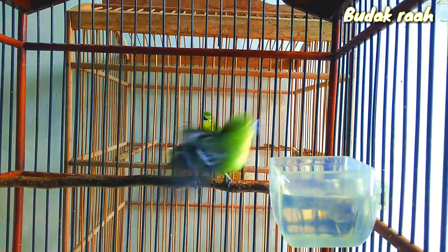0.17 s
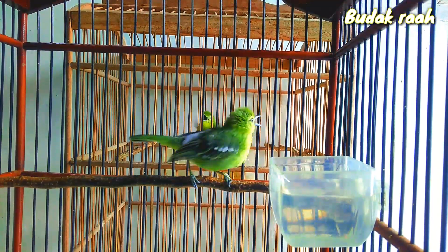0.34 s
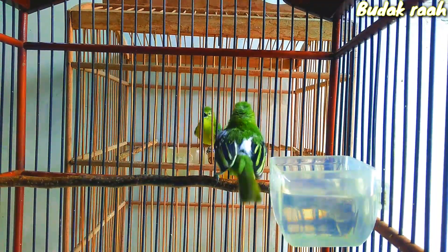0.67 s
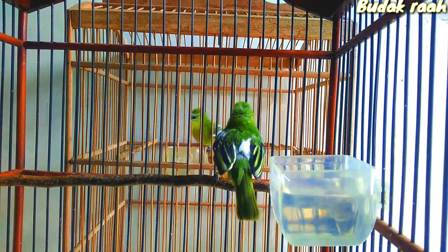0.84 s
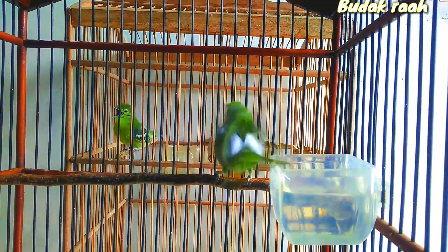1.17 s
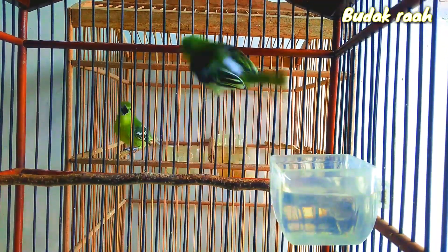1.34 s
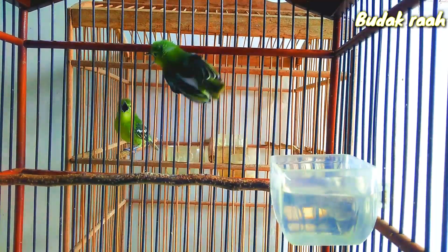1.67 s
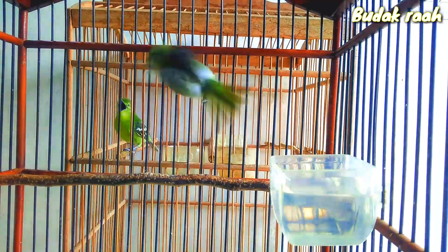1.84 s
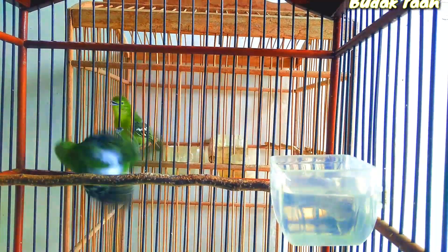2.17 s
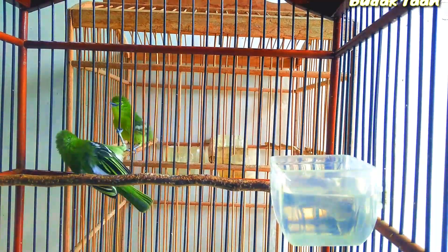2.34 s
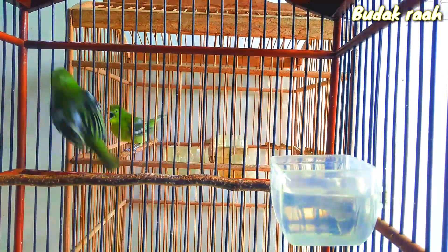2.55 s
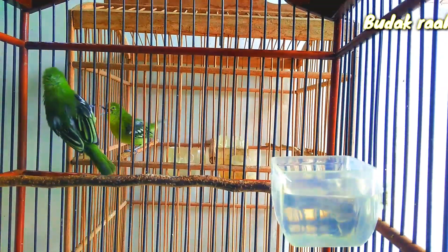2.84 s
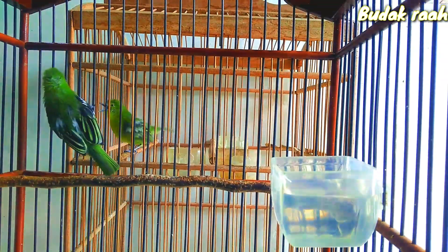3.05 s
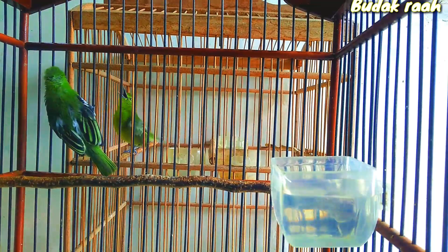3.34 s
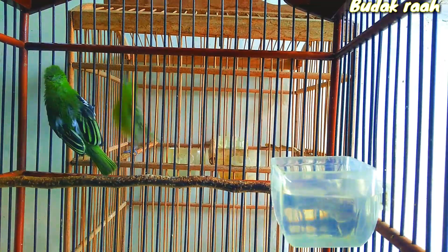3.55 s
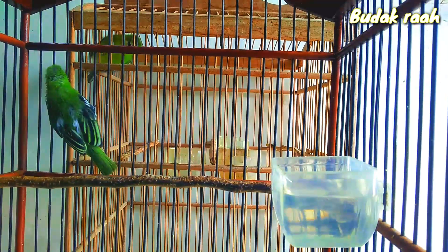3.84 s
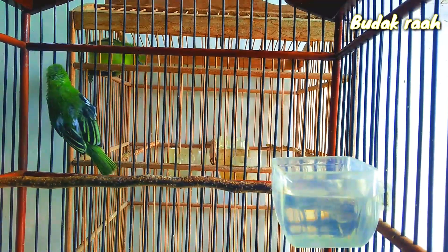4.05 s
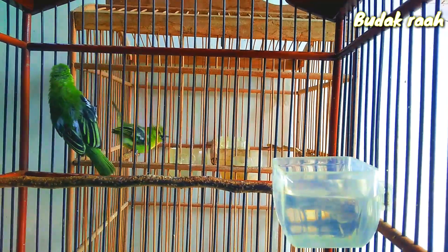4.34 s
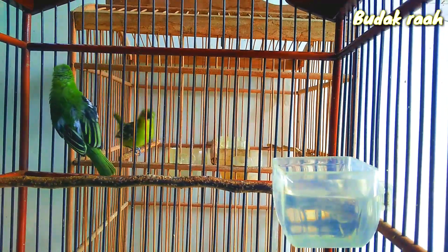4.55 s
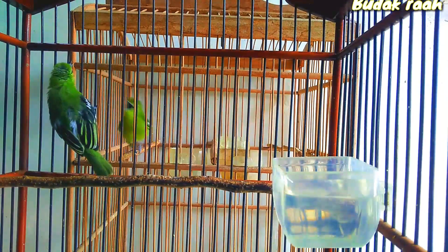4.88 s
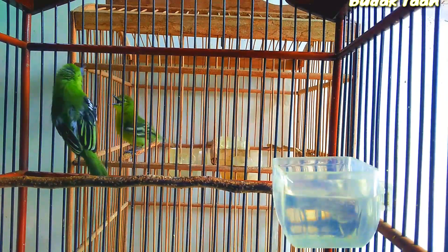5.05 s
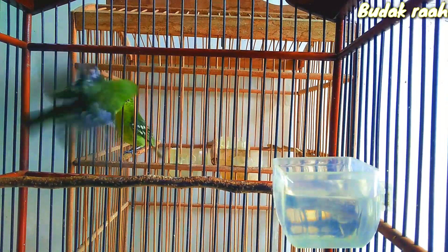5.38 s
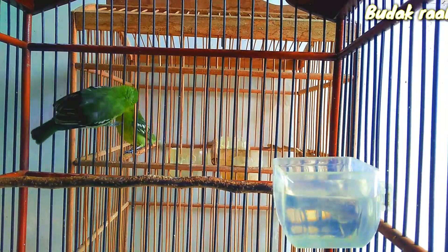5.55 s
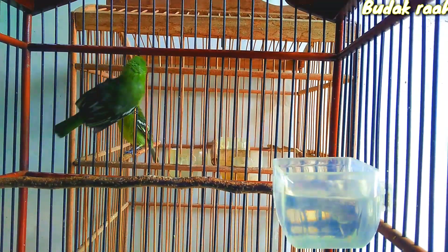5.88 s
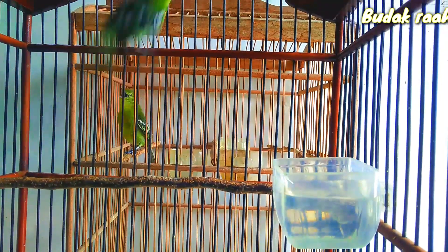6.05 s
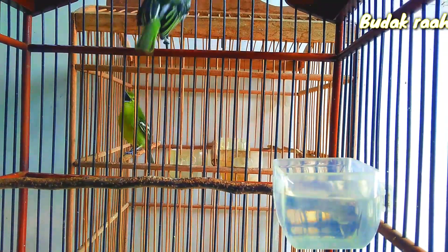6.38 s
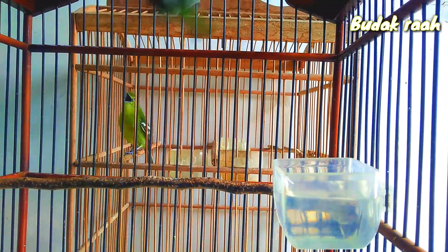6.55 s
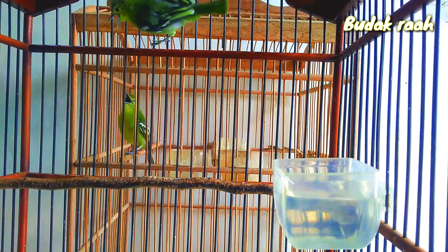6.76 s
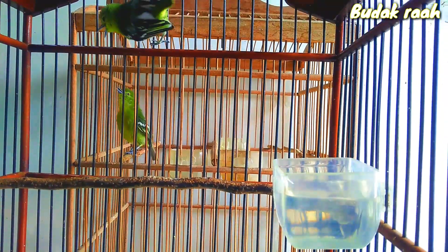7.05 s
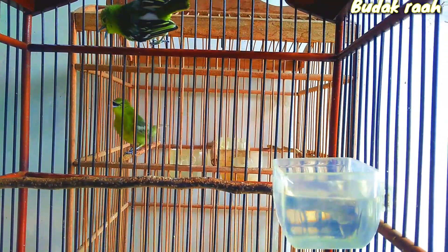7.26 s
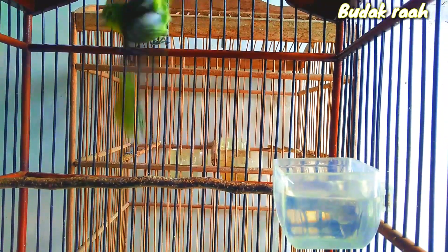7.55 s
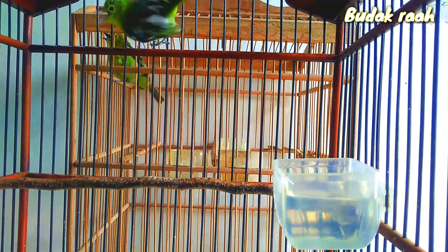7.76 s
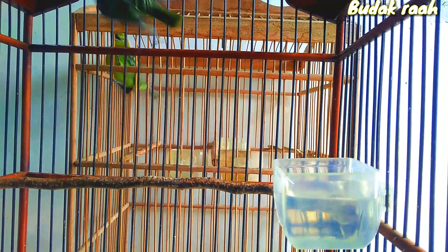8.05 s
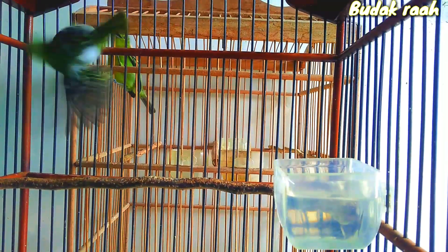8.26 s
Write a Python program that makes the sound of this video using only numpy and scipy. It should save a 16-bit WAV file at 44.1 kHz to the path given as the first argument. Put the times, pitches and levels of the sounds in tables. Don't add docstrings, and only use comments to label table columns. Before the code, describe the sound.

A small caged bird gives harsh buzzing rasps, rough chips and falling whistles while another trills and a distant one chirps over low traffic rumble.

```python
import sys
import numpy as np
from scipy import signal
from scipy.fft import rfft, irfft, next_fast_len
from scipy.io import wavfile
from scipy.ndimage import uniform_filter1d

SR = 44100
rng = np.random.default_rng(int(sys.argv[2]) if len(sys.argv) > 2 else 0)


def how_loud(loudness_db):
    steps = np.asarray(loudness_db, float) / 20
    return 10 ** steps


def file_out(sig):
    cols = np.atleast_2d(sig).T
    lim = np.clip(cols, -1, 1)
    pcm = np.round(lim * 32767).astype(np.int16)
    wavfile.write(sys.argv[1], SR, pcm)


N = 371322

# (time [s], level [dB])
TRAFFIC_NEARNESS = [(0, -19.5), (.4, -23), (1.1, -10), (1.5, -11.5), (2.099, -15), (2.6, -21), (3.0, -16),
                    (3.5, -13.5), (4.602, -5.5), (5.099, -4.5), (5.4, -12), (5.9, -5.5), (6.3, -10.5),
                    (6.8, -14), (7.3, -6), (7.85, 1.5), (8.15, -7.5), (8.42, -5)]
# (frequency [Hz], density [dB per Hz])
RUMBLE_SPECTRUM = [(20, 1.5), (40, 0.5), (60, 15), (110, 12.5), (135, -4.5), (200, -44), (600, -100)]
DRONE_SPECTRUM = [(90, -39.5), (135, 7.5), (200, 2.5), (260, -0.5), (350, -9), (500, -26), (1500, -100)]
MURMUR_SPECTRUM = [(200, -18), (290, 1.5), (650, -2.5), (1000, -3.5), (2500, -16.5), (5000, -23),
                   (12000, -82)]
HISS_SPECTRUM = [(1470, -19), (2500, -13.5), (3710, -19), (6540, -13.5), (9050, -11), (9980, -4.5),
                 (12600, -22.5), (15200, -37)]
BOOM_SPECTRUM = [(30, -40.5), (60, -6.5), (85, 4.5), (112, 2), (140, -10.5), (200, -42), (600, -100)]
LAYER_LEVEL_DB = [-49.5, -48.5, -54, -58]
LAYER_SWELL_SHARE = [0.62, 1.31, 1.17, 1.01]
# (time [s], rate [Hz])
ENGINE_FIRING = [(0.7, 33.2), (0.98, 32.6), (1.3, 28.7), (2.22, 24.3), (2.61, 21.9), (2.8, 20.0),
                 (3.08, 19.5), (3.38, 23.3), (3.7, 26.5), (4.09, 29.4), (4.49, 29.8), (5.89, 29.7),
                 (6.51, 26.9), (7.07, 27.7), (7.8, 26.5), (8.4, 27.9)]
# (time [s], level [dB], half width [s])
BASS_SWELLS = [(0.868, -47, 0.042), (1.29, -42, 0.087), (1.498, -49, 0.08), (1.71, -48, 0.19),
               (2.34, -51, 0.079), (6.802, -41, 0.2)]
# (time [s], level [dB], half width [s])
MURMUR_GUSTS = [(2.21, -50.5, 0.059), (2.67, -66.5, 0.017), (3.12, -70.5, 0.017), (3.45, -64.5, 0.14),
                (5.03, -67, 0.014), (6.8, -52, 0.25), (7.24, -48.5, 0.074), (7.9, -51.5, 0.049)]
# (start [s], length [s], resonance [Hz], level [dB])
HOLLOW_MOANS = [(0, 1, 596, -82), (1.751, 0.14, 223, -59.5), (2.634, 0.09, 477, -62),
                (3.076, 0.12, 622, -62.5), (3.411, 0.17, 1042, -63), (3.619, 0.12, 357, -59.5),
                (4.105, 0.23, 738, -74), (6.742, 0.8, 652, -60.5), (7.704, 0.65, 623, -62.5),
                (8.234, 0.12, 387, -55)]

# (time [s], peak [dB], perch knock [dB], scuff length [s])
BAR_TICKS = [(0.0014, -41, -40, 0.0015), (0.0625, -36, -23, 0.0033), (0.31, -50, -25, 0.0014),
             (0.5286, -46.5, -18, 0.0042), (0.5417, -38, -16.5, 0.0031), (2.2022, -10.5, -20, 0.0023),
             (2.537, -34.5, -40, 0.0033), (2.559, -39.5, -37, 0.0014), (2.6206, -34, -25, 0.0027),
             (2.644, -21.5, -35, 0.0019), (2.686, -35.5, -34, 0.0082), (2.7184, -42.5, -21, 0.0018),
             (2.734, -34.5, -32, 0.0018), (4.313, -35.5, -50, 0.0034), (4.345, -31, -40, 0.003),
             (4.3785, -35.5, -44, 0.0041), (4.454, -30.5, -24, 0.0034), (4.668, -49.5, -21, 0.00091),
             (4.724, -27, -34, 0.0021), (5.322, -47, -28.5, 0.01), (5.365, -38.5, -27, 0.00098),
             (5.3802, -50.5, -27, 0.0034), (5.414, -37, -20, 0.0041), (5.846, -35.5, -18, 0.0036),
             (5.8904, -26.5, -30, 0.0042), (6.1395, -22.5, -26.5, 0.0032), (6.215, -20, -28.5, 0.002),
             (7.658, -60.5, -25, 0.003), (6.539, -20, -49, .006), (8.2893, -15, -31, 0.001)]
# (frequency [Hz], density [dB per Hz])
SCUFF_SPECTRUM = [(880, -89.5), (1500, -25), (3080, -25), (4810, -28), (5240, -17.5), (7150, -16.5),
                  (9030, -0.5), (15200, -2.5)]
# (frequency [Hz], level [dB], T60 [s])
PERCH_MODES = [(462, 2, 0.049), (670, 13, 0.025), (1170, -9.5, 0.023)]

# (time [s], start pitch [Hz], end pitch [Hz], length [s], level [dB])
FAR_CHIRPS = [
    (3.26, 4180, 6980, 0.024, -41),
    (4.054, 5154, 5020, 0.033, -34.5),
    (4.705, 4960, 4400, 0.056, -42),
    (6.532, 4350, 6100, 0.01, -28),
    (6.613, 4135, 4114, 0.017, -33),
    (6.727, 5790, 5560, .02, -37.5),
    (6.77, 5380, 4987, 0.036, -37),
    (7.707, 4600, 7840, .012, -45),
    (7.718, 5530, 4750, 0.046, -50.5),
    (8.275, 4980, 4800, 0.039, -40.5),
]

# (time [s], pitch [Hz], level [dB])
TRILLS = [
    [(2.907, 3163, -25.5), (3.056, 3202, -14.5), (3.404, 3142, -6.5), (3.556, 3125, -6.5),
     (3.811, 3063, -8.5), (4.132, 3021, -9), (4.466, 2937, -13.5), (4.696, 2933, -12.5), (4.926, 2838, -26)],
    [(8.217, 3107, -24.5), (8.27, 3197, -16), (8.32, 3250, -9), (8.369, 3248, -13.5)],
]
# (notes sung so far [1], time [s])
TRILL_PACE = [
    [(0, 2.907), (10, 3.404), (18, 3.811), (24, 4.132), (30, 4.466), (38, 4.926)],
    [(0, 8.217), (1, 8.27), (3, 8.369)],
]
# (time [s], extra level [dB])
NOTE_ACCENTS = [(3.76, 0.5), (3.865, -1.5), (4.025, -1.5), (4.08, 2.5), (4.19, -5.5), (4.243, 3.5),
                (4.3, -3), (4.355, -2), (4.41, 5.5), (4.52, 0.5), (4.64, 0.5), (4.7, -1.5), (4.755, 10),
                (4.81, 13.5)]
FIRST_TICK_LEVEL_DB = [-29, -46]
# (pitch multiple [1], level [dB])
REED_PARTIALS = [(2, -25.5), (3, -20.5), (4, -29), (5, -21.5)]
# (time [s], left minus right [dB])
HEAD_BALANCE = [(2.9, -4), (3.12, .5), (3.36, 0), (3.73, -10), (4.2, -7), (4.5, -3), (4.6, -7), (4.9, -6),
                (8.2, 3), (8.4, 3)]

# (time [s], effort [dB], beak opening [0-1])
RASP_GESTURES = [
    [(.84, -23, 0), (1.076, -21.5, 0.27), (1.39, -19.5, .5), (1.74, -17, 0.63), (1.88, -18, 0.62),
     (1.928, -25, 0.95), (2.102, -23.5, 1.02), (2.17, -43.5, 0.96)],
    [(5.76, -41.5, 0.7), (5.8, -30, 0.16), (5.92, -23, .1), (6.3, -18.5, 0.36), (6.5, -19, 0.5),
     (6.806, -14, 0.73), (6.924, -18, 0.92), (6.98, -70.5, 1)],
]
RASP_BUZZ_DEPTH = [.15, .5]
RASP_FLUTTER_DEPTH = [.55, .25]
RASP_WIDTH_HZ = [1500, 1250]
RASP_THROAT_FACTOR = [0.98, .95]
# (pitch multiple [1], level [dB])
BYPASS_PARTIALS = [(1, -29), (2, -23.5), (3, -17.5), (4, -32.5), (5, -39), (6, -37)]
# (frequency [Hz], gain [dB])
WINDPIPE_RESPONSE = [(900, -35), (1150, -1.5), (2600, -1), (2780, 0.5), (3000, -3.5), (5000, 0.6),
                     (5600, -5), (6600, -6)]
# (time [s], peak [dB], brightness [dB], throat resonance [Hz], length [s])
CHIP_CALLS = [(0.6387, -14, -25, 3860, 0.058), (0.792, -12, -30, 3540, 0.057),
              (2.936, -14, -15, 4076, 0.033), (3.071, -15.5, -20, 3780, 0.037),
              (4.744, -11, -19, 4270, 0.024), (4.823, -13, -12, 3854, 0.036),
              (4.908, -12.5, -14.5, 3950, 0.032), (4.98, -16.5, -7.5, 4165, 0.05),
              (5.6086, -17.5, -12, 4050, 0.036), (5.7308, -16, -24.5, 3410, 0.12),
              (8.269, -18.5, -21.5, 4280, 0.05)]
# (frequency [Hz], gain [dB])
BODY_RESPONSE = [(500, -31), (1100, -9.5), (1550, -2.5), (2600, 0), (4200, -3), (6000, -2.5), (15000, -5)]
# (time [s], pitch [Hz], level [dB])
FALLING_WHISTLES = [
    [(2.25, 2384, -57), (2.272, 2276, -36), (2.31, 2193, -35.5), (2.345, 2081, -17), (2.38, 1995, -23.5),
     (2.41, 1880, -26.5), (2.45, 1710, -24.5), (2.47, 1700, -38), (2.5, 1420, -54.5)],
    [(4.997, 2492, -19.5), (5.015, 2426, -9.5), (5.05, 2294, -15.5), (5.08, 2172, -23.5), (5.11, 1920, -16),
     (5.146, 1536, -21.5), (5.16, 1490, -39), (5.18, 1206, -38)],
    [(7.07, 2330, -50), (7.1, 2315, -40), (7.135, 2188, -29), (7.172, 2113, -18), (7.212, 1990, -25.5),
     (7.25, 1814, -27.5), (7.275, 1686, -32), (7.3, 1610, -57)],
]
# (frequency [Hz], level [dB])
OVERTONE_RESPONSE = [(3000, -58), (4400, -54), (6500, -65.5), (9000, -43), (10500, -40.5), (12000, -30.5),
                     (14000, -42), (15500, -66)]
OVERTONE_LEVEL_DB = [-8, 3, -7.5]
OVERTONE_LOSS_DB = [13, 1.5, 25]
# (pitch multiple [1], level [dB])
HOARSE_PARTIALS = [(1, -3.8), (2, -15.5), (5, -21.5), (6, -25)]
# (frequency [Hz], width [Hz], depth share [1])
BAR_NULLS = [
    [(1720, 200, .8), (2780, 150, .93), (3520, 130, .85), (5350, 130, .85), (6050, 220, .9),
     (7700, 300, .7)],
    [(1750, 200, .7), (2850, 150, .75), (3420, 100, .5), (6000, 150, .6), (7700, 350, .75)],
]

# (frequency [Hz], T60 [s])
PORCH_DECAY = [(200, 0.04), (1000, 0.18), (2200, 0.28), (4000, 0.17), (8000, 0.37), (14000, 0.09)]
# (frequency [Hz], left minus right [dB])
PORT_BALANCE = [(60, 4.5), (150, 6.5), (380, 7.5), (940, 6), (2360, 9.5), (5910, 10.5), (14800, -4)]
# (frequency [Hz], level [dB per bin])
DROPOUT_FLOOR = [(1000, -125), (11000, -118), (12500, -100), (15000, -100.5), (16000, -63.5)]
# (frequency [Hz], depth under loudest band [dB])
DROPOUT_RANGE = [(1000, 56), (3000, 54), (6000, 54), (10000, 52), (12000, 44), (15000, 36)]


def evened(x):
    return x / np.sqrt(np.mean(x ** 2) + 1e-20)


def read(points, hz):
    f, value = np.transpose(points)
    return np.interp(np.log(hz + 1), np.log(f + 1), value)


def track(rows):
    return np.interp(np.arange(N) / SR, *np.transpose(rows))


def curves(rows):
    s, *columns = np.transpose(rows)
    t = np.arange(s[0], s[-1], 1 / SR)
    return [np.interp(t, s, c) for c in columns]


def add(mix, s, sound):
    part = mix[max(round(s * SR), 0):][:len(sound)]
    part += sound[:len(part)]


def apply_gain(x, gain_at):
    length = x.shape[-1]
    size = next_fast_len(length, True)
    gain = gain_at(np.fft.rfftfreq(size, 1 / SR))
    return irfft(rfft(x, size) * gain, size)[..., :length]


def colour(x, db_table):
    return apply_gain(x, lambda hz: how_loud(read(db_table, hz)))


def wander(size, hz):
    width = max(int(SR / hz / 2), 1)
    once = uniform_filter1d(rng.standard_normal(size), width)
    return evened(uniform_filter1d(once, width))


def resonate(x, hz, width_hz):
    turn = np.exp(2j * np.pi * np.cumsum(hz * np.ones(len(x))) / SR)
    r = np.exp(-np.pi * width_hz / SR)
    smooth = signal.lfilter([1 - r], [1, -r], x / turn + 1e-18)
    return 2 * (turn * smooth).real


def partials(hz, table, scatter=0.0):
    phase = 2 * np.pi * np.cumsum(hz) / SR
    return sum(how_loud(db) * np.cos(k * phase + scatter * 2 * np.pi * rng.random()) for k, db in table)


def swells(rows):
    t = np.arange(0, N, 64) / SR
    gain = sum(how_loud(db) * np.exp(-((t - s) / width_s) ** 2) for s, db, width_s in rows)
    return np.interp(np.arange(N) / SR, t, gain)


def street():
    near_db = track(TRAFFIC_NEARNESS)
    gains = [how_loud(db + share * near_db) for db, share in zip(LAYER_LEVEL_DB, LAYER_SWELL_SHARE)]
    gains[2] = gains[2] + swells(MURMUR_GUSTS)
    gains.append(swells(BASS_SWELLS))
    firing_hz = track(ENGINE_FIRING) * (1 + 0.003 * wander(N, 3.2))
    cylinders = [(k, 5.1 * wander(N, 1.6)) for k in range(2, 10)]
    engine = evened(partials(firing_hz, cylinders, scatter=0.91))
    spectra = [RUMBLE_SPECTRUM, DRONE_SPECTRUM, MURMUR_SPECTRUM, HISS_SPECTRUM, BOOM_SPECTRUM]
    port_differences = [1.7, 1.3, 1.2, 0.5, 0.9]
    engine_shares = [0.38, 0.45, 0.2, 0.07, 0.35]
    out = np.zeros((2, N))
    for gain, spectrum, apart, tonal in zip(gains, spectra, port_differences, engine_shares):
        shared, left, right = rng.standard_normal((3, N))
        air = shared + tonal * engine + apart * np.array([left, right])
        out += gain * how_loud(2.4 * wander(N, 6)) * evened(colour(air, spectrum))
    return out


def moans(width_hz=22):
    out = np.zeros(N)
    for s, length_s, hz, db in HOLLOW_MOANS:
        air = rng.standard_normal(int(length_s * SR))
        ring = evened(resonate(resonate(air, hz, width_hz), hz, width_hz))
        add(out, s, how_loud(db) * ring * signal.windows.tukey(len(air), 0.6))
    return out


def cage():
    scuffs, knocks = np.zeros(N), np.zeros(N)
    t = np.arange(3000) / SR
    ring = sum(how_loud(db - 60 * t / t60) * np.sin(2 * np.pi * hz * t) for hz, db, t60 in PERCH_MODES)
    grit = evened(colour(rng.standard_normal(N), SCUFF_SPECTRUM))
    for s, db, knock_db, length_s in BAR_TICKS:
        u = t / length_s
        add(scuffs, s - length_s / 2, how_loud(db + 2) * u * np.exp(1 - u))
        add(knocks, s, how_loud(db + knock_db - 8) * ring)
    return scuffs * grit + knocks


def far_bird():
    out = np.zeros(N)
    for s, from_hz, to_hz, length_s, db in FAR_CHIRPS:
        hz = np.linspace(from_hz, to_hz, int(length_s * SR))
        hz = hz * (1 + 0.005 * wander(len(hz), 600))
        chirp = partials(hz, [(1, 1.0), (2, 0.97)])
        add(out, s, how_loud(db) * chirp * signal.windows.tukey(len(hz), 0.4))
    return out


def trill_notes(spread_db=1.3, tick_db=-42, tick_spread_db=3.5):
    rows = []
    for trill, pace, first_db in zip(TRILLS, TRILL_PACE, FIRST_TICK_LEVEL_DB):
        s, hz, db = np.transpose(trill)
        k = np.arange(pace[-1][0] + 1)
        at = np.interp(k, *np.transpose(pace))
        held = np.clip((k - 12) / (21 - 12), 0, 1)
        luck_db = spread_db * rng.standard_normal(len(k))
        tick_luck_db = tick_spread_db * rng.standard_normal(len(k))
        accent_db = sum(more_db * (abs(at - when) < 0.025) for when, more_db in NOTE_ACCENTS)
        note_db = np.interp(at, s, db) + accent_db + luck_db
        ticks_db = np.where(k == 0, first_db, tick_db + tick_luck_db)
        rows += zip(at, np.interp(at, s, hz), note_db, ticks_db, held)
    return rows


def triller(gap_s=0.009, rise_s=0.013, fall_s=0.01, slide=0.1, slide_s=0.005, reedy_s=0.008):
    short_hold_s, long_hold_s, second_tick_s = 0.002, 0.02, 0.019
    out = np.zeros(N)
    t = np.arange(200) / SR
    tick_hz = 4500 - 280000 * t
    tick = np.sin(2 * np.pi * np.cumsum(tick_hz) / SR) * np.hanning(len(t))
    for s, pitch_hz, db, tick_db, held in trill_notes():
        hold_s = short_hold_s + (long_hold_s - short_hold_s) * held ** 2
        u = np.arange(int((rise_s + hold_s + fall_s) * SR)) / SR
        hz = pitch_hz * (1 - slide * np.exp(-u / slide_s))
        swell = np.clip(np.minimum(u / rise_s, (u[-1] - u) / fall_s), 0, 1) ** 2
        whistle = swell * partials(hz, [(1, 0.0045)])
        rough_hz = hz * (1 + 0.0049 * wander(len(u), 900))
        reed = swell * np.exp(-u / reedy_s) * partials(rough_hz, REED_PARTIALS)
        leak = how_loud(-39) * np.sqrt(swell) * rng.standard_normal(len(u))
        add(out, s + gap_s, how_loud(db) * (whistle + reed + leak))
        add(out, s, how_loud(tick_db) * tick * (1 + 1.1 * wander(len(t), 1500)))
        second = tick[::-1] * (1 + 1.3 * wander(len(t), 1500))
        add(out, s + second_tick_s, min(2 * held, 1) * how_loud(tick_db) * second)
    return out


def rasp(effort_db, bright_db, throat_hz, buzz_hz, pitch_hz, swing=0.13, rough=0.024, gate=0.55,
         flutter=0.05, width_hz=1450, low_db=0.0):
    size = len(buzz_hz)
    beat = 2 * np.pi * np.cumsum(buzz_hz * (1 + 0.024 * wander(size, 70))) / SR
    hz = pitch_hz * (1 + swing * np.sin(beat + 0.8) + rough * wander(size, 500))
    air = 1 + gate * np.cos(beat) + flutter * np.cos(3 * beat + 1.9)
    drive = air * partials(hz, [(2, -9.5), (3, 7), (4, -3.5), (5, -4)])
    throat = evened(resonate(resonate(drive, throat_hz, width_hz), throat_hz, width_hz))
    upper = [(6, 0.0), (7, -20.5), (8, 6.5), (9, 6.5), (10, 4.5), (11, -6.5), (12, 0.5), (13, -0.5)]
    bright_band = evened(air * partials(hz, upper))
    bright_band = evened(resonate(bright_band, 3 * throat_hz, 3100) + 0.093 * bright_band)
    bypass = air * partials(hz, BYPASS_PARTIALS)
    return how_loud(effort_db) * (throat + how_loud(low_db) * bypass + how_loud(bright_db) * bright_band)


def long_rasps():
    shut_hz, open_hz = 3253, 4600
    shut_db, open_db = -30.5, 0
    shut_buzz_hz, open_buzz_hz = 125, 115
    shut_swing, open_swing = 0.1, 0.12
    voice_hz, scoop_depth, scoop_s = 1193.5, 0.2, 0.018
    out = np.zeros(N)
    for rows, gate, flutter, factor, width_hz in zip(
            RASP_GESTURES, RASP_BUZZ_DEPTH, RASP_FLUTTER_DEPTH, RASP_THROAT_FACTOR, RASP_WIDTH_HZ):
        effort_db, gape = curves(rows)
        scoop = 1 - scoop_depth * np.exp(-np.arange(len(gape)) / SR / scoop_s)
        sound = rasp(effort_db,
                     bright_db=shut_db + (open_db - shut_db) * gape,
                     throat_hz=factor * (shut_hz + (open_hz - shut_hz) * gape ** 1.15),
                     buzz_hz=shut_buzz_hz + (open_buzz_hz - shut_buzz_hz) * gape,
                     pitch_hz=voice_hz * scoop * (1 + 0.005 * wander(len(gape), 6)),
                     swing=shut_swing + (open_swing - shut_swing) * gape,
                     gate=gate, flutter=flutter, width_hz=width_hz)
        add(out, rows[0][0], sound * signal.windows.tukey(len(sound), 0.03))
    return colour(out, WINDPIPE_RESPONSE)


def chip(db, bright_db, throat_hz, length_s):
    one = np.ones(int(length_s * SR))
    burst = rasp(db - 9, bright_db, throat_hz * one, 190 * one, 1180 * one,
                 swing=0.17, rough=0.18, gate=0.04, width_hz=1150, low_db=6.5)
    return colour(burst, BODY_RESPONSE) * signal.windows.tukey(len(one), 0.9)


def falling_whistle(hz, db, edge_db, loss_db):
    edge_hz, overtone_follow, crack_db, pitch_scatter = 2020, 0.3, -17.5, 0.12
    pure = how_loud(db) * partials(hz, [(1, 0.0066)])
    shift_db = edge_db - loss_db * np.maximum(edge_hz - hz, 0) / 100
    overtones = partials(hz, [(k, read(OVERTONE_RESPONSE, k * hz) + shift_db) for k in range(2, 9)])
    cracked_hz = hz * (1 + pitch_scatter * wander(len(hz), 500))
    hoarse = np.clip((edge_hz - hz) / 150, 0, 1) * partials(cracked_hz, HOARSE_PARTIALS)
    leak = 2 * colour(rng.standard_normal(len(hz)), BODY_RESPONSE)
    sound = pure + how_loud(overtone_follow * db) * overtones + how_loud(db + crack_db) * hoarse + how_loud(db - 41.5) * leak
    return np.sqrt(2) * sound * signal.windows.tukey(len(sound), 0.12)


def rasper():
    out = long_rasps()
    for s, *settings in CHIP_CALLS:
        add(out, s - 0.006, chip(*settings))
    for rows, edge_db, loss_db in zip(FALLING_WHISTLES, OVERTONE_LEVEL_DB, OVERTONE_LOSS_DB):
        hz, db = curves(rows)
        add(out, rows[0][0], falling_whistle(hz, db, edge_db, loss_db))
    return out


def porch(x, wet_db, lag, pan_db, apart=0.5, ring=0.91, turns=1.3):
    size = SR * 2 // 5
    taps = np.zeros((6, size))
    at = np.arange(120, size - 20, 20) + rng.integers(0, 20, (6, (size - 121) // 20))
    np.put_along_axis(taps, at, rng.choice([-1., 1.], at.shape), 1)
    angle = 2 * np.pi * turns * np.arange(N) / SR
    both = np.array([x, x])
    for place, share in zip(taps.reshape(2, 3, size), [np.cos(angle), np.sin(angle)]):
        hz, t, z = signal.stft(place[0] + apart * place[1:], SR, nperseg=256)
        decay = how_loud(-60 * t / (ring * read(PORCH_DECAY, hz)[:, None]))
        tail = signal.istft(z * decay, SR, nperseg=256)[1]
        echo = signal.oaconvolve((share * x)[None], tail, axes=1)[:, :N]
        both = both + how_loud(wet_db) / np.linalg.norm(tail[0]) * echo
    left = np.pad(both[0], (int(lag), 0))[:N]
    return np.array([left * how_loud(pan_db / 2), both[1] * how_loud(-pan_db / 2)])


def cancel(x, nulls):
    def dips(hz):
        return np.prod([1 - share / (1 + (2 * (hz - at_hz) / width_hz) ** 2)
                        for at_hz, width_hz, share in nulls], axis=0)
    return apply_gain(x, dips)


def scene():
    hop_s = 2.83
    bars = porch(cage(), wet_db=-7, lag=2, pan_db=-1.5, apart=1.4, ring=0.6)
    far = porch(far_bird(), wet_db=5, lag=3, pan_db=5, apart=1.5, ring=1.3)
    s, turn_db = np.transpose(HEAD_BALANCE)
    turn = how_loud(np.outer([0.5, -0.5], np.interp(np.arange(N) / SR, s, turn_db)))
    trill = turn * porch(triller(), wet_db=-9, lag=8, pan_db=0, apart=1.0, ring=0.85)
    near = how_loud(3.5) * porch(rasper(), wet_db=-0.5, lag=7, pan_db=-0.7, apart=1.1, turns=0.5987)
    parts = np.split(near, [int(hop_s * SR)], axis=1)
    near = np.hstack([cancel(part, nulls) for part, nulls in zip(parts, BAR_NULLS)])
    return street() + moans() + bars + far + trill + near


def drop_weak_treble(x, chance_db=8, size=4):
    top = 504
    hz, _, z = signal.stft(x, SR, nperseg=1024, noverlap=768)
    frames = z.shape[2]
    power = uniform_filter1d(abs(z) ** 2, 8, axis=2)[:, :top]
    db = 10 * np.log10(power.reshape(2, -1, size, frames).mean(2) + 1e-20)
    luck = rng.standard_normal((frames // 4 + 1, db.shape[1])).T
    luck = np.repeat(luck, 4, axis=1)[:, :frames]
    luck = evened(uniform_filter1d(luck, size=14, axis=1))
    band_hz = hz[size // 2:top:size]
    floor_db = read(DROPOUT_FLOOR, band_hz)[:, None]
    relative_db = db.max(1, keepdims=True) - read(DROPOUT_RANGE, band_hz)[:, None]
    keep = (db + chance_db * luck > relative_db) & (db + 3 * luck > floor_db)
    keep[:, :6] = True
    z[:, :top] *= np.repeat(np.maximum(keep, 0.02), size, axis=1)
    return signal.istft(z, SR, nperseg=1024, noverlap=768)[1][:, :N]


def roll_off(x):
    return signal.sosfilt(signal.butter(12, 15400, fs=SR, output="sos"), x)


def record(dry):
    hz, db = np.transpose(PORT_BALANCE)
    left = colour(dry[0], np.transpose([hz, db / 2]))
    right = colour(dry[1], np.transpose([hz, -db / 2]))
    clipped = np.clip(np.array([left, right]), -1, 1)
    mix = drop_weak_treble(clipped)
    return roll_off(mix)


dry = scene()
out = record(dry)
file_out(out)
```